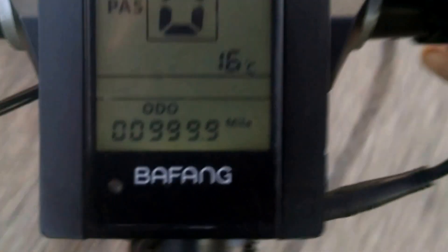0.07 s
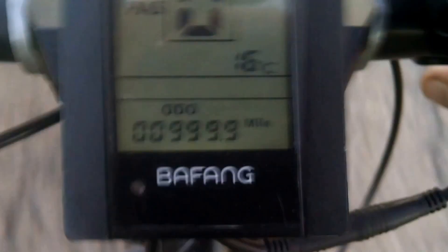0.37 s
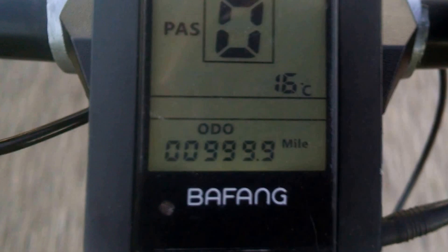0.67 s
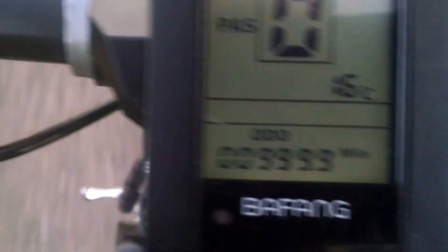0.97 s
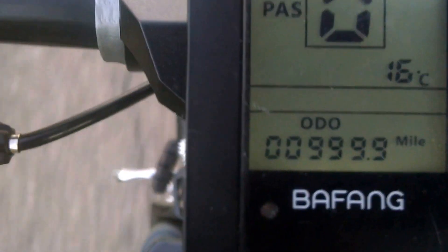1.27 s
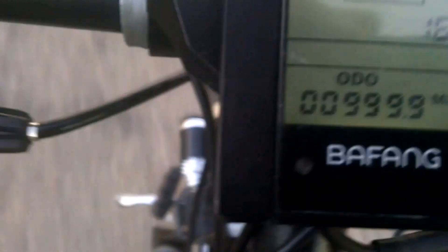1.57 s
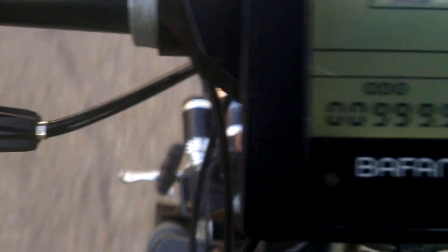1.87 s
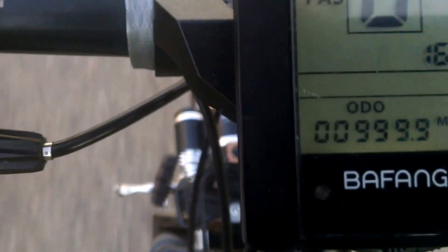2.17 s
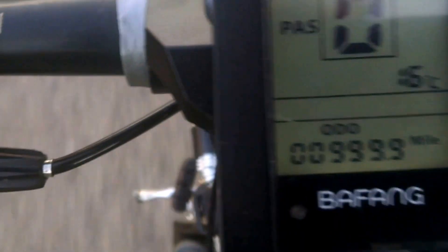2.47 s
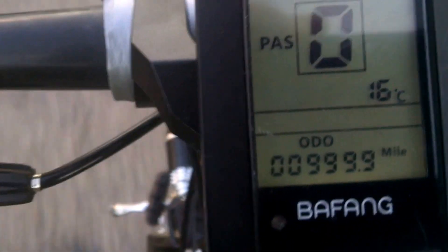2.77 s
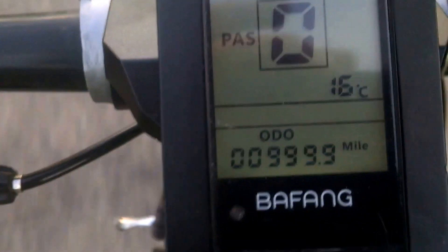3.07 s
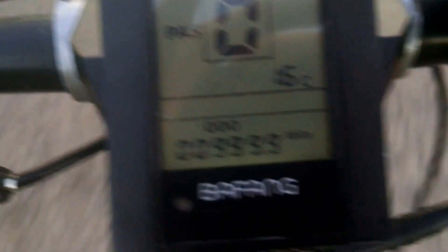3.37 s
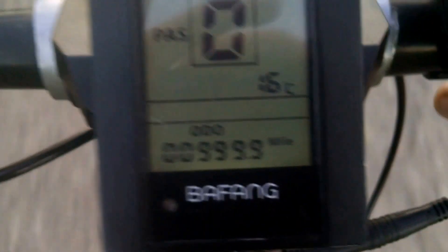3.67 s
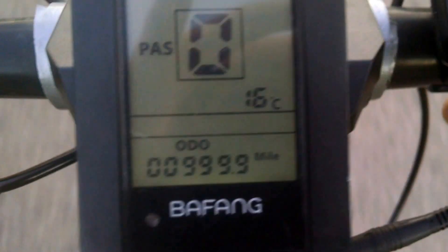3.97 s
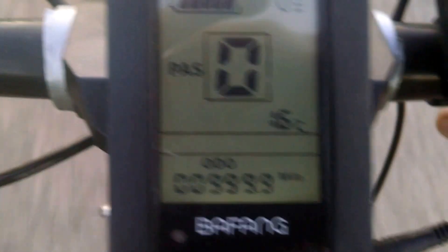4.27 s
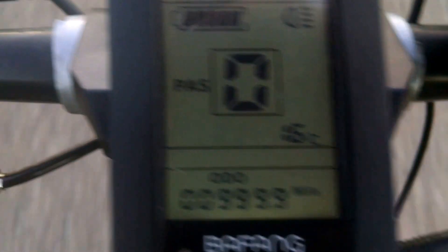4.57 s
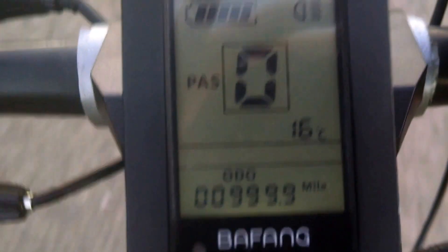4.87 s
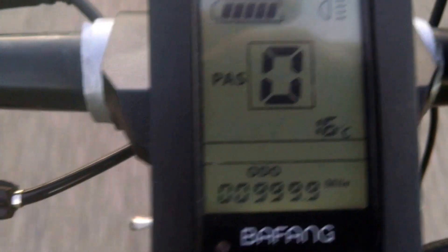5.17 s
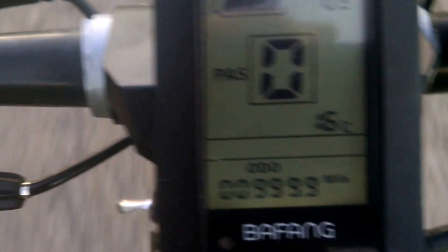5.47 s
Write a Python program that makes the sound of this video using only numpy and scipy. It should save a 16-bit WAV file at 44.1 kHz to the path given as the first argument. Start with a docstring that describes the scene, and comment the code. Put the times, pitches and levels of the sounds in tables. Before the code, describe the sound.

A rolling bicycle's dry chain chirps with short, very high squeaks and ticks, over tyre rumble and wind buffeting the microphone.

```python
"""On a paved road, at the handlebar of a rolling bicycle. The dry chain ticks as its links strike the
sprocket. Stick-slip friction makes link after link rasp and break into a short, very high squeak,
and the rubbing drives narrow resonances of the metal. The rollers peep; fittings knock and creak.
Beneath this the tyres rumble on the road and wind buffets the two microphone ports."""
import sys
import numpy as np
from scipy import signal
from scipy.fft import rfft, irfft
from scipy.io import wavfile
from scipy.ndimage import uniform_filter1d

SR = 44100
rng = np.random.default_rng(int(sys.argv[2]) if len(sys.argv) > 2 else 0)


def inscribe(sig):
    """Save sig as 16-bit PCM at rate SR to the path in sys.argv[1].

    A 1-D sig is mono; a 2-D sig holds one channel per row.
    Samples are clipped to [-1, 1] before scaling.
    """
    pcm = np.round(np.clip(np.atleast_2d(sig).T, -1, 1) * 32767)
    wavfile.write(sys.argv[1], SR, pcm.astype(np.int16))


N = 247842
TIME = np.arange(N) / SR
FREQS = np.maximum(np.fft.rfftfreq(N, 1 / SR), 1)

# Levels are relative: each source applies its own gain.
# dry links turning on their pins: start t/s, duration/s, level/dB, lowest f/Hz, sag/Hz, climb/Hz
LINK_SQUEAKS = [(.160, 0.023, -27.5, 9580, 100, 400), (0.232, 0.017, -25.5, 9040, 100, 350),
                (0.47, 0.0093, -25, 9000, 230, 220), (0.491, 0.03, -23.5, 9160, 150, 980),
                (.533, 0.014, -16, 8900, 150, 64), (0.557, 0.037, -21.5, 9100, 100, 1200),
                (0.605, 0.049, -23, 9030, 350, 750), (0.763, 0.027, -21, 9350, 580, 710),
                (0.885, 0.039, -22.5, 9210, 100, 750), (1.101, 0.0097, -27.5, 9270, 17, 280),
                (1.154, 0.032, -22.5, 9140, 440, 930), (1.201, 0.0084, -16, 9160, 250, 50),
                (1.217, 0.036, -31.5, 9400, 100, 460), (1.237, 0.0082, -15.5, 8920, 360, 62),
                (1.266, 0.053, -19, 8910, 220, 560), (1.499, 0.021, -25, 9420, 33, 610),
                (1.537, 0.043, -22.5, 9270, 100, 560), (1.615, 0.032, -25.5, 8970, 600, 800),
                (1.814, 0.022, -19, 9130, 140, 290), (1.853, 0.054, -27, 9100, 340, 350),
                (1.917, 0.065, -25, 9130, 220, 510), (1.998, 0.044, -29.5, 9350, 180, 290),
                (2.12, 0.0064, -26, 9200, 48, 200), (2.139, 0.032, -22.5, 9440, 100, 720),
                (2.21, 0.018, -22.5, 9220, 150, 540), (2.271, 0.032, -25.5, 9200, 100, 480),
                (2.355, 0.0066, -28, 9060, 100, 110), (2.447, 0.0068, -24.5, 9200, 300, 16),
                (2.465, 0.035, -23.5, 9370, 220, 900), (2.511, 0.047, -24, 8970, 280, 580),
                (2.576, 0.015, -24.5, 8950, 31, 170), (2.6, 0.0034, -11, 9100, 37, 44),
                (2.609, .02, -22, 9220, 10, 700), (2.64, 0.013, -30, 8900, 400, 20),
                (2.656, 0.032, -21.5, 9020, 38, 510), (2.729, 0.012, -29.5, 9200, 65, 400),
                (2.831, 0.017, -27.5, 9000, 420, 91), (2.851, 0.028, -17, 9140, 50, 110),
                (2.916, 0.027, -26.5, 8950, 600, 290), (3.17, 0.025, -19.5, 8950, 85, 80),
                (3.211, 0.015, -23, 8850, 250, 30), (3.237, 0.019, -16, 9070, 10, 200),
                (3.274, 0.03, -20, 8900, 140, 210), (3.307, 0.018, -20.5, 9000, 10, 500),
                (3.335, 0.011, -19, 9030, 85, 80), (3.404, 0.004, -16.5, 8950, 130, 62),
                (3.466, 0.0056, -17.5, 8860, 280, 93), (3.554, 0.015, -20.5, 9020, 46, 600),
                (3.621, 0.0055, -17.5, 9030, 100, 80), (3.773, 0.0038, -21, 9050, 100, 22),
                (3.795, 0.027, -23, 9220, 31, 560), (3.842, 0.0084, -29, 9200, 100, 110),
                (3.856, 0.0064, -25, 9050, 400, 20), (3.87, 0.011, -17, 9200, 10, 390),
                (3.9, 0.024, -26.5, 9040, 150, 92), (3.934, 0.017, -24.5, 9040, 47, 980),
                (3.966, 0.017, -31.5, 9100, 100, 320), (4.046, .012, -22, 9240, 76, 50),
                (4.06, 0.011, -17, 9210, 50, 410), (4.105, 0.032, -22.5, 9250, 150, 600),
                (4.135, 0.067, -22.5, 8980, 1300, 370), (4.406, 0.004, -28, 9250, 150, 16),
                (4.434, 0.017, -34.5, 9400, 36, 440), (4.47, 0.011, -28, 9000, 220, 30),
                (4.483, 0.03, -20, 8940, 23, 330), (4.534, 0.011, -30, 8900, 700, 22),
                (4.555, 0.027, -22.5, 9150, 10, 320), (4.676, 0.031, -22.5, 9280, 110, 1200),
                (4.719, 0.011, -25, 9030, 250, 110), (4.738, 0.03, -29.5, 9250, 200, 550),
                (4.808, 0.0096, -26.5, 9100, 350, 130), (4.876, 0.013, -26.5, 9140, 17, 750),
                (5, 0.0094, -25.5, 9300, 20, 350), (5.029, 0.0089, -27, 8950, 100, 100),
                (5.052, 0.021, -22.5, 9180, 650, 390), (5.088, 0.07, -26, 8970, 48, 2400),
                (5.184, 0.014, -22, 9200, 9.2, 910), (5.246, 0.014, -21.5, 9380, 20, 290),
                (5.274, 0.019, -28.5, 9050, 73, 280), (5.302, 0.019, -21, 9180, 100, 400),
                (5.357, 0.043, -26, 9020, 220, 2300), (5.432, 0.016, -31, 9150, 380, 100),
                (5.461, 0.012, -23, 8940, 250, 92), (5.49, 0.027, -27, 9520, 22, 550),
                (5.611, 0.0091, -20, 9130, 110, 120)]
# links grinding on teeth: t/s, level/dB, squeal f/Hz, level of sizzle and octave/dB
LINK_RASPS = [(.236, -48, 7500, -46), (.474, -42, 7400, -50), (0.554, -38.5, 7400, -47),
              (0.62, -29.5, 7360, -28), (.892, -35, 7400, -30), (1.154, -35.5, 7440, -36),
              (1.218, -32.5, 7450, -35), (1.542, -34.5, 7550, -38), (1.821, -34, 7600, -35),
              (1.865, -41, 7600, -50), (1.9, -37, 7200, -39), (1.931, -39, 7500, -47),
              (2.004, -44, 7360, -40), (2.145, -37, 7700, -45), (2.209, -40, 7550, -38),
              (2.263, -43, 7500, -42), (2.358, -41.5, 7600, -46), (2.452, -34.5, 7550, -37),
              (2.529, -32.5, 7540, -33), (2.583, -33.5, 7360, -35), (2.649, -35.5, 7530, -35),
              (2.852, -32.5, 7400, -35), (2.915, -35.5, 7370, -36), (3.227, -30.5, 7100, -30),
              (3.293, -31.5, 6930, -32), (3.406, -36.5, 7500, -44), (3.472, -37.5, 7300, -44),
              (3.494, -34, 7500, -33), (3.535, -35.5, 7440, -33), (3.554, -36, 7450, -37),
              (3.786, -31.5, 7200, -33), (3.846, -32.5, 7450, -36), (3.902, -38, 7460, -37),
              (3.916, -31, 7100, -31), (3.939, -42, 7200, -41), (3.976, -33, 7450, -35),
              (4.051, -32, 7020, -31), (4.108, -30, 7050, -36), (4.475, -36, 7400, -42),
              (4.485, -32.5, 6960, -32), (4.548, -34.5, 7170, -29), (4.686, -35.5, 7500, -43),
              (4.749, -42, 7400, -40), (4.812, -43, 7430, -46), (4.998, -34.5, 7130, -30),
              (5.048, -39, 7300, -39), (5.097, -38, 7400, -38), (5.307, -36.5, 7340, -34),
              (5.358, -43, 7400, -37), (5.480, -41, 7500, -39)]
SPROCKET_RUBS = [(.24, -33), (.372, -39), (.405, -39), (.56, -38), (.698, -34), (1.16, -37), (1.217, -29),
                 (1.245, -48), (1.47, -37), (1.543, -30), (1.83, -42), (1.88, -33), (1.93, -36),
                 (2.001, -31), (2.155, -31), (2.212, -28), (2.27, -37), (2.47, -42), (2.6, -46),
                 (2.912, -32), (3.232, -33), (3.5, -35), (3.538, -30.5), (3.842, -35), (3.906, -43),
                 (3.935, -35), (3.975, -45), (4.125, -34), (4.443, -39), (4.48, -50), (4.553, -36),
                 (4.75, -32), (4.81, -50), (5.05, -38), (5.298, -30), (5.357, -39), (5.483, -28.5)]  # rubs that ring the sprocket: t/s, level/dB
SEATING_TICKS = [(.025, -54), (.137, -50), (.235, -42), (.32, -39), (.384, -42), (.455, -35), (.684, -35),
                 (.723, -32), (0.76, -35), (.83, -37), (.948, -33), (0.989, -34), (1.027, -36),
                 (1.068, -36), (1.15, -49), (1.322, -38), (1.369, -36), (1.414, -39), (1.525, -34),
                 (1.641, -38), (1.679, -38.5), (1.804, -39), (2.082, -38), (2.124, -34.5), (2.161, -34),
                 (2.24, -35), (2.407, -41), (2.488, -35), (2.731, -39), (2.769, -51), (2.885, -37),
                 (3.038, -40), (3.077, -40), (3.116, -41), (3.193, -40), (3.344, -33), (3.382, -43),
                 (3.457, -38.5), (3.644, -40), (3.718, -37), (3.754, -37), (4.291, -38.5), (4.323, -37),
                 (4.36, -47), (4.4, -38), (4.642, -56), (4.68, -37), (4.761, -32), (4.831, -37),
                 (4.869, -35.5), (4.904, -37), (4.941, -45), (5.015, -37), (5.089, -37), (5.165, -36),
                 (5.238, -35), (5.349, -38), (5.579, -37)]  # the clearest impacts of seating links: t/s, level/dB
HISS_LEVELS = [(0.0, -47), (0.72, -45), (0.95, -48), (1.33, -45), (2.1, -45.5), (2.66, -45.5), (3.0, -44.5),
               (3.6, -45.5), (4.4, -45), (5.62, -43.5)]  # running noise of the chain: t/s, level/dB
ROLLER_PEEPS = [(.833, 14500, -26), (1.098, 10800, -33), (1.395, 14500, -38), (1.43, 13300, -38),
                (1.485, 14300, -31), (1.58, 13300, -39), (1.698, 12300, -35), (1.76, 12400, -35),
                (2.414, 12100, -36), (2.487, 13050, -33), (2.81, 13050, -35), (2.976, 14400, -40),
                (2.989, 11400, -32), (3.0, 13200, -34), (3.169, 11200, -36), (3.606, 12000, -39),
                (4.003, 14800, -33), (4.014, 12800, -35), (4.242, 13800, -33), (4.273, 13000, -40),
                (5.387, 11400, -34), (5.555, 12700, -35)]  # the clearest roller whistles: t/s, f/Hz, level/dB
FITTING_KNOCKS = [(0.064, -45, 1270), (0.329, -44, 890), (1.593, -39.5, 1190), (1.652, -44.5, 1330),
                  (2.87, -45.5, 1210), (3.142, -46.5, 1260), (4.293, -44, 1170), (4.399, -45, 1260),
                  (4.483, -43, 960)]  # fittings jolted by bumps: t/s, level/dB, f/Hz
WIND_LEVELS = [(0.0, -29.5), (0.5, -34.5), (0.7, -34.5), (1.0, -31), (1.4, -34.5), (2.0, -33.5),
               (2.3, -33.5), (2.65, -31), (3.35, -36.5), (3.7, -32.5), (4.4, -33.5), (5.1, -31.5),
               (5.62, -31.5)]  # slow course of the wind: t/s, level/dB
WIND_THUMPS = [(0.088, .05, -29.5), (0.223, 0.022, -28), (0.312, 0.049, -32), (0.44, 0.062, -30),
               (.822, 0.025, -22.5), (1.777, 0.014, -23), (1.996, 0.044, -34), (2.146, 0.063, -38),
               (2.494, 0.042, -25), (2.76, 0.033, -28), (3.242, 0.021, -30), (3.577, 0.032, -31),
               (4.58, .03, -32), (4.725, 0.036, -37), (4.964, 0.021, -27), (5.465, 0.023, -25)]  # brief gusts: t/s, half duration/s, level/dB

# Spectral densities of the noises: f/Hz, level/dB
CHAFE_SPECTRUM = [(8400, -1), (8850, 10), (9300, -37), (9850, 11.5), (10400, -8), (11200, 2), (12500, -14),
                  (15400, -3)]  # loose friction around a squeak
RASP_SPECTRUM = [(3000, -51), (4600, -12), (5700, 34.5), (6550, 32), (7050, 15), (7600, 32.5), (7950, 49),
                 (8600, 12), (10500, 8.5), (12500, -26), (15500, -4)]  # link sliding on a tooth
SIZZLE_SPECTRUM = [(10000, 8), (12700, -9), (13700, 14), (14400, 16), (15400, -3), (16000, -10)]  # top octave of that sliding
CLICK_SPECTRUM = [(2000, -20), (3400, -7), (5000, -1), (6500, 2), (9500, 0), (12500, -4), (15400, -1)]  # grinding link landing
SEAT_SPECTRUM = [(2000, 0), (2800, -30), (3500, -6), (5100, -0.5), (6500, 3), (8000, 0.5), (9400, 4.5),
                 (11000, 3), (12700, -2), (14300, -1), (15400, 1)]  # link seating
HISS_SPECTRUM = [(2000, -33), (2700, 0.5), (3500, 13), (5200, -1.5), (6300, 8), (7800, 7), (8600, 5),
                 (9400, 14.5), (10300, 9.5), (11300, 9), (12700, 7.5), (14300, 11.5), (15400, 10.5)]  # running chain
CLATTER_SPECTRUM = [(500, -27), (850, -22), (1150, 16), (1420, -1.5), (1700, -23), (2400, 6.5)]  # fittings shaken by the road's grain
TYRE_SPECTRUM = [(60, 2.5), (170, 1), (225, -3), (262, 4.5), (320, -1), (400, -4), (540, -1), (850, -4),
                 (1050, -9), (1300, -11), (1430, -7), (1550, -14), (2200, -17), (2600, -36.5)]  # rolling tyres
WIND_SPECTRUM = [(20, -4), (45, 6.5), (70, 7.5), (110, 3), (170, -7.5), (260, -19), (500, -29), (1000, -70),
                 (2200, -24), (3000, -52)]  # turbulence at the ports

RASP_RISE_S, RASP_FALL_S = 0.0071, 0.0076
OPPOSED = np.array([[1], [-1]])  # opposite signs at the left and right ports


def squeaks(jitter_hz=45, locked_db=-18, stall_db=-30, bend_power=2.45, overrun=0.1314):
    """Stick-slip oscillation: pitch sags as a link takes load, then climbs and weakens as it lets go."""
    tone, chafe = np.zeros(N, complex), np.zeros(N)
    wobble = jitter_hz * drift(224)
    for start, length, db, hz, sag, climb in LINK_SQUEAKS:
        at, grip = hold(start, length, release=0.0031)
        _, rubbing = hold(start, length, release=0.0022, lead=0.0073)
        turned = np.clip((TIME[at] - start) / length, -overrun, 1 + overrun)
        bend = turned * abs(climb) ** (1 / bend_power) - (1 - turned) * abs(sag) ** (1 / bend_power)
        lift_hz = np.abs(bend) ** bend_power  # a flat-bottomed bowl
        firmness = from_db(db - locked_db)
        pitch = hz + lift_hz + wobble[at] * (2 - grip) / firmness
        tone[at] += from_db(db - 5 * lift_hz / 600) * grip * oscillator(pitch)
        chafe[at] += np.sqrt(firmness) * rubbing
    grinding = swells([(s, RASP_RISE_S, RASP_FALL_S, db - stall_db) for s, db, _, _ in LINK_RASPS])
    stalled = tone / (1 + grinding ** 2)  # a hard rasp stalls the tone
    jerks = uniform_filter1d(slips(per_s=250, decay_s=0.0041), size=30)
    hoarse = 1 / (1 + (np.abs(tone) / from_db(locked_db)) ** 2)  # a light grip chatters, a hard one sings
    squeak = scatter(stalled, share=.8 * hoarse, rate_hz=270, jerks=1 + 2.3 * hoarse * jerks)
    link_plate = from_db(-11) * resonance(squeak, hz=8890, width_hz=160)
    friction = from_db(-36) * chafe * rms_one(0.3 + jerks) * spread(CHAFE_SPECTRUM, apart=0.91)
    return squeak + link_plate + friction


def swishes(centre_hz=11100, slide_hz=995, half_s=0.0079, full_climb_hz=700):
    """Friction at release: a squeak ends in a hoarse upward scrape, stronger after a larger climb."""
    rows = []
    for start, length, db, _, _, climb in LINK_SQUEAKS:
        climb_db = 20 * np.log10(min(abs(climb) / full_climb_hz, 1) + 1e-6)
        rows.append((start + length, -40 + .4 * (db + 23) + climb_db, centre_hz, slide_hz, half_s))
    return scatter(glides(rows), share=7, rate_hz=720)


def rasps(ease_hz=250, right_db=0.6):
    """Impact, then sliding friction: a click, grit, and a squeal that rises as the pressure eases."""
    squeal, octave = np.zeros((2, N), complex)
    for s, db, hz, high_db in LINK_RASPS:
        at, grip = swell(s, RASP_RISE_S, RASP_FALL_S)
        tone = oscillator(hz + ease_hz * np.tanh((TIME[at] - s) / (2 * RASP_FALL_S)))
        squeal[at] += from_db(db + 1) * grip * tone
        octave[at] += from_db(high_db - 4) * grip * tone ** 2
    sliding = swells([(s, RASP_RISE_S, RASP_FALL_S, db - 5) for s, db, _, _ in LINK_RASPS])
    sizzling = swells([(s, RASP_RISE_S, RASP_FALL_S, db - 3) for s, _, _, db in LINK_RASPS])
    landing = swells([(s, RASP_RISE_S, 0.01, db - 6.5) for s, db, _, _ in LINK_RASPS])
    friction = sliding * spread(RASP_SPECTRUM, apart=0.69) + sizzling * spread(SIZZLE_SPECTRUM, apart=0.76)
    clicks = landing * spread(CLICK_SPECTRUM, apart=0.082)
    grit = rms_one(0.21 + slips(per_s=210, decay_s=0.011))
    squeals = scatter(squeal, share=2.1, rate_hz=180) + scatter(octave, share=4, rate_hz=450)
    return (friction * grit + clicks + squeals) * from_db(-right_db * OPPOSED)


def sprocket(mode_hz=8167, wander_hz=40, rise_s=0.012, fall_s=0.017):
    """Forced resonance: one narrow mode is fed in jerks by rubbing links, faintly by the running chain."""
    rubs = swells([(s, rise_s, fall_s, db) for s, db in SPROCKET_RUBS], let_go=3.5)
    strength = rubs * rms_one(1 + .8 * flutter(280)) + from_db(-62) * flutter(40)
    pitch = mode_hz + wander_hz * drift(118)
    return scatter(strength * oscillator(pitch), share=1.0, rate_hz=62)


def peeps(slide_hz=-330, half_s=0.0045):
    """Frequency glides: rollers give thin falling whistles, a few clear ones among many faint ones."""
    faint = rng.uniform([0, 10500, -51], [N / SR, 14300, -39], (70, 3))  # t/s, f/Hz, level/dB
    rows = [(s, db - 1.5, hz, slide_hz, half_s) for s, hz, db in np.vstack([ROLLER_PEEPS, faint])]
    return scatter(glides(rows), share=2.4, rate_hz=380)


def chain(links_per_s=26.3, rise_s=0.0041, fall_s=0.0045):
    """Periodic impact: links seat on the sprocket with a tick, over the hiss of the running chain."""
    seats = list(SEATING_TICKS)
    for (s, db), (next_s, next_db) in zip(SEATING_TICKS, SEATING_TICKS[1:]):
        count = int(round((next_s - s) * links_per_s))
        for k in range(1, count):  # the links in between seat more softly and unevenly
            seats.append((s + (next_s - s) * k / count, (db + next_db) / 2 - 1 + rng.standard_normal()))
    seating = swells([(s, rise_s, fall_s, db - 3.5) for s, db in seats])
    ticks = seating * spread(SEAT_SPECTRUM, apart=0.17)
    hiss = rms_one(1.2 + slips(per_s=200, decay_s=.008)) * spread(HISS_SPECTRUM, apart=0.66)
    return ticks + from_db(2.5 + np.interp(TIME, *np.transpose(HISS_LEVELS))) * hiss


def knocks(width_hz=600, rise_s=.0025, fall_s=.005):
    """Heavily damped resonance: fittings knock on bumps and clatter lightly on the road's grain."""
    out, rattle = np.zeros(N), rng.standard_normal(N)
    for s, db, hz in FITTING_KNOCKS:
        body = resonance(resonance(rattle, hz, width_hz), hz, width_hz)
        out += swells([(s + rise_s, rise_s, fall_s, db + 5.5)]) * evened(body[None])[0]
    clatter = from_db(-58) * rms_one(slips(per_s=70, decay_s=0.036)) * noise(CLATTER_SPECTRUM)
    return out + clatter


def creak(s=2.370, db=-37, hz=1680, slide_hz=-300, half_s=.004):
    """Stick-slip: a fitting slips once with a short, falling squeak."""
    return scatter(glides([(s, db, hz, slide_hz, half_s)]), share=0.3, rate_hz=200)


def tyres(left_db=0.87):
    """Rolling noise: the rumble reaches both ports largely in phase."""
    rumble = from_db(-39 + 0.79 * drift(32)) * spread(TYRE_SPECTRUM, apart=0.31)
    return rumble * from_db(left_db * OPPOSED)


def wind(left_db=1.53):
    """Turbulent pressure: wind pushes on one port while it pulls on the other, and thumps in gusts."""
    thumps = swells([(s, half, half, db) for s, half, db in WIND_THUMPS])
    breeze = from_db(np.interp(TIME, *np.transpose(WIND_LEVELS)))
    turbulence = evened(spread(WIND_SPECTRUM, apart=0.21), size=4000) * OPPOSED
    return np.hypot(breeze, thumps) * turbulence * from_db(left_db * OPPOSED)


def scatter(tone, share, rate_hz, jerks=1, swing_limit=1.5):
    """Multipath interference off the moving frame and spokes: a tone flickers differently at each port."""
    paths = evened(np.array([1 + share * flutter(rate_hz) for side in range(2)]) * jerks)
    paths = paths / np.sqrt(1 + (np.abs(paths) / swing_limit) ** 2)  # a friction tone swings only so far
    return np.sqrt(2) * (tone * evened(paths)).real


def from_the_right(pair, lead_s=.000408, turn_rad=2.05):
    """Path difference: sound reaches the right port first, with an added constant phase shift."""
    lead = np.exp(1j * (2 * np.pi * FREQS * lead_s + turn_rad))
    return np.array([pair[0], irfft(rfft(pair[1]) * lead, N)])


def resonance(x, hz, width_hz):
    """A damped mode with unit gain at its peak."""
    r = np.exp(-np.pi * width_hz / SR)
    poles = [1, -2 * r * np.cos(2 * np.pi * hz / SR), r * r]
    return (1 - r * r) / 2 * signal.lfilter([1, 0, -1], poles, x + 1e-18)


def oscillator(hz):
    """A complex tone whose phase is the integral of frequency."""
    return np.exp(2j * np.pi * np.cumsum(hz) / SR)


def glides(rows):
    """Superposed short whistles, each sweeping from hz - slide_hz to hz + slide_hz."""
    tone = np.zeros(N, complex)
    for s, db, hz, slide_hz, half_s in rows:
        at, grip = swell(s, half_s, half_s, catch=4, let_go=4)
        pitch = hz + slide_hz * np.tanh((TIME[at] - s) / half_s)
        tone[at] += from_db(db) * grip * oscillator(pitch)
    return tone


def hold(start, length, release, lead=0, attack=0.00055):
    """Samples and envelope of one squeak: it catches quickly, holds and lets go."""
    at = np.arange(max(0, int((start - .02) * SR)), min(N, int((start + length + .05) * SR)))
    age = TIME[at] - start
    return at, 1 / ((1 + np.exp(-(age + lead) / attack)) * (1 + np.exp((age - length) / release)))


def swell(s, rise, fall, catch=12.0, let_go=1.45):
    """Samples and envelope of one rub: power-law flanks about a peak of 1."""
    at = np.arange(max(0, int((s - 4 * rise) * SR)), min(N, int((s + 6 * fall) * SR)))
    late = TIME[at] - s
    return at, 1 / (1 + np.where(late < 0, np.abs(late / rise) ** catch, np.abs(late / fall) ** let_go))


def swells(rows, let_go=2.1):
    """Superposed envelopes from rows of t/s, rise/s, fall/s, level/dB."""
    out = np.zeros(N)
    for s, rise, fall, db in rows:
        at, grip = swell(s, rise, fall, let_go=let_go)
        out[at] += from_db(db) * grip
    return out


def slips(per_s, decay_s):
    """Shot noise of mean 1: each tiny random slip is a jump in strength that dies away."""
    jumps = (rng.random(N) < per_s / SR) * rng.random(N) ** 2
    strength = signal.lfilter([1], [1, -np.exp(-1 / (decay_s * SR))], jumps + 1e-18)
    return strength / strength.mean()


def noise(spectrum):
    """Spectrally shaped noise of unit power."""
    hz, db = np.transpose(spectrum)
    gain = from_db(np.interp(np.log(FREQS), np.log(hz), db, left=-70, right=-70))
    return rms_one(irfft(rfft(rng.standard_normal(N)) * gain, N))


def spread(spectrum, apart):
    """Partial coherence: a noise shared by both ports plus one in antiphase."""
    return rms_one(noise(spectrum) + apart * noise(spectrum) * OPPOSED)


def drift(rate_hz):
    """Smooth random fluctuation of unit power with a Gaussian spectrum."""
    white = rfft(rng.standard_normal(N))
    return rms_one(irfft(white * np.exp(-.5 * (FREQS / rate_hz) ** 2), N))


def flutter(rate_hz):
    """Random modulation of amplitude and phase, at unit power."""
    return rms_one(drift(rate_hz) + 1j * drift(rate_hz))


def evened(x, size=600):
    """Hold the channels' joint short-term power at 1, keeping the fast flicker."""
    return x / np.sqrt(uniform_filter1d(np.mean(np.abs(x) ** 2, axis=0), size=size) + 1e-12)


def rms_one(x):
    """Scale to unit power."""
    return x / np.sqrt(np.mean(np.abs(x) ** 2) + 1e-20)


def from_db(db):
    """Level to amplitude ratio."""
    return 10 ** (np.asarray(db) / 20)


def scene():
    """Superposition of drivetrain, fittings, tyres and wind."""
    drivetrain = squeaks() + swishes() + rasps() + sprocket() + peeps() + chain()
    return from_the_right(drivetrain) + knocks() + creak() + tyres() + wind()


def record(dry):
    """Low-pass filtering: the treble is cut steeply above 15650 Hz."""
    return signal.sosfilt(signal.ellip(10, .2, 80, 15650, fs=SR, output="sos"), dry)


dry = scene()
out = record(dry)
inscribe(out)
```